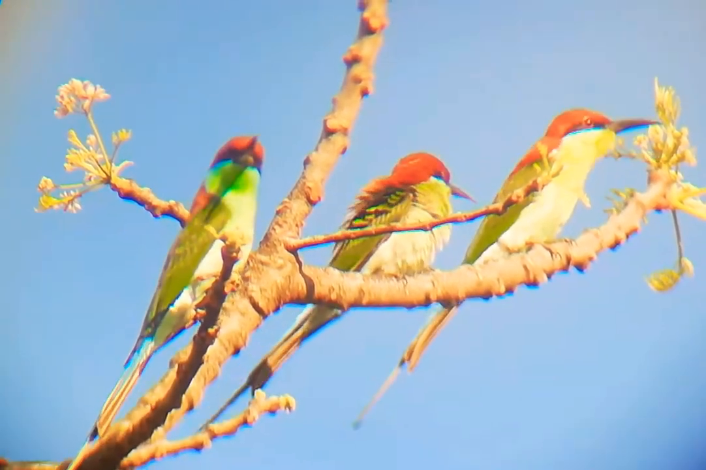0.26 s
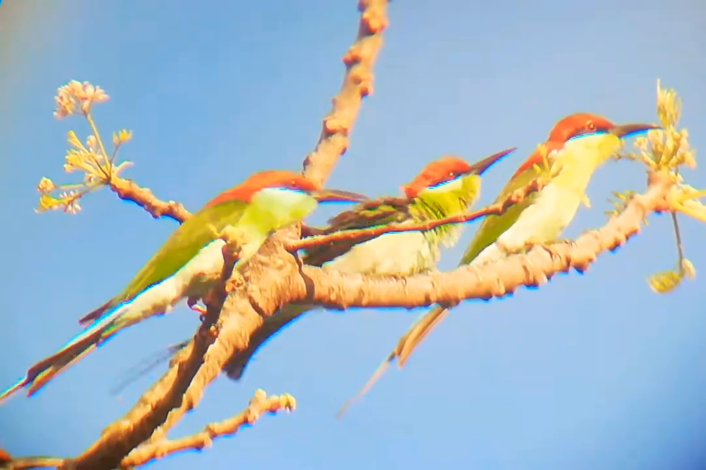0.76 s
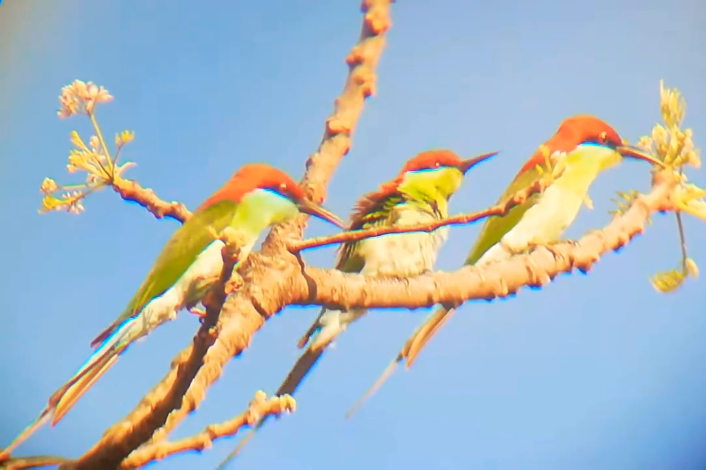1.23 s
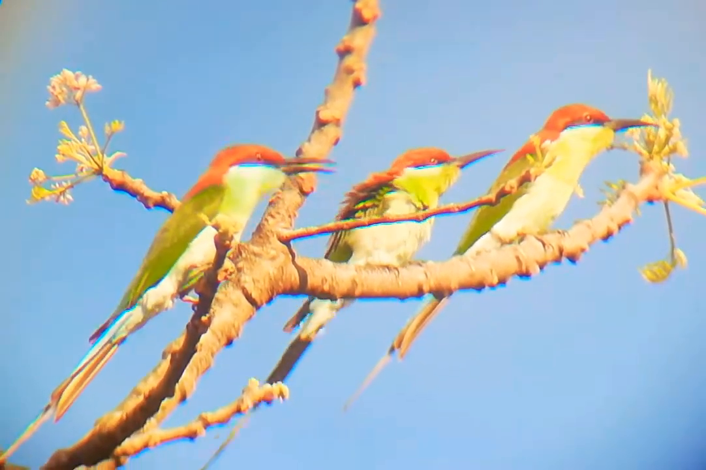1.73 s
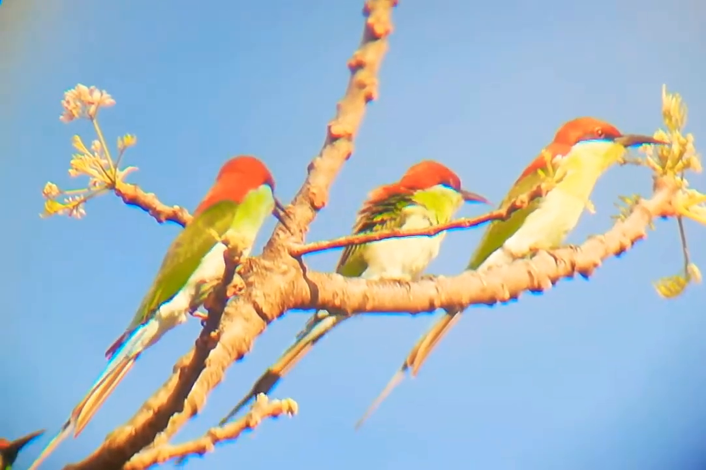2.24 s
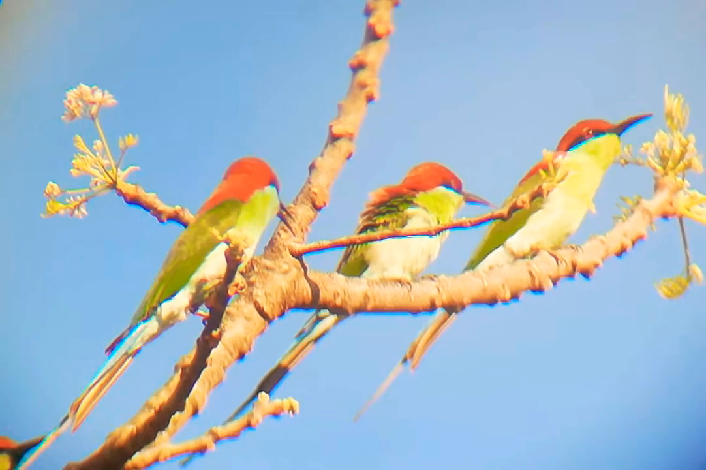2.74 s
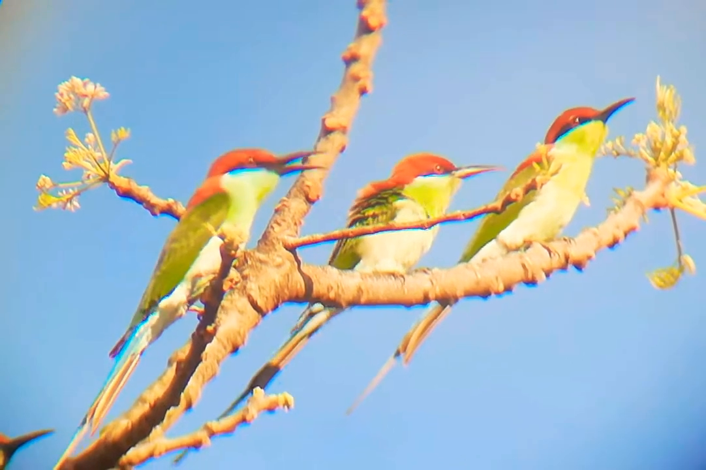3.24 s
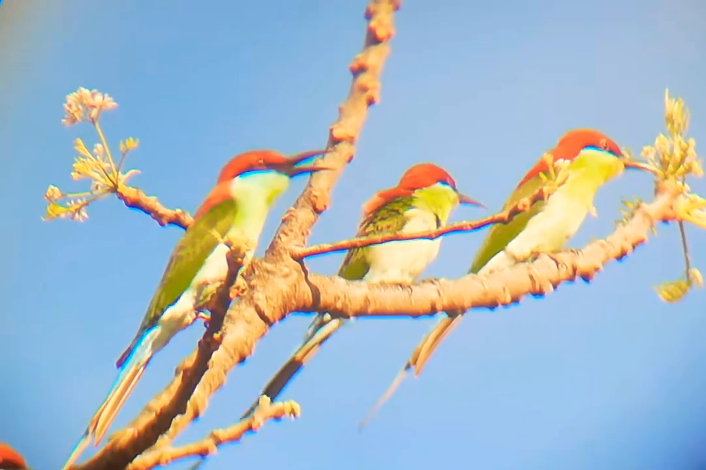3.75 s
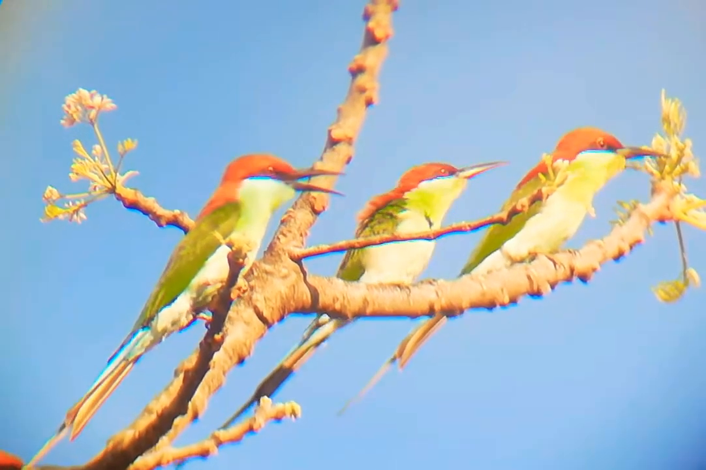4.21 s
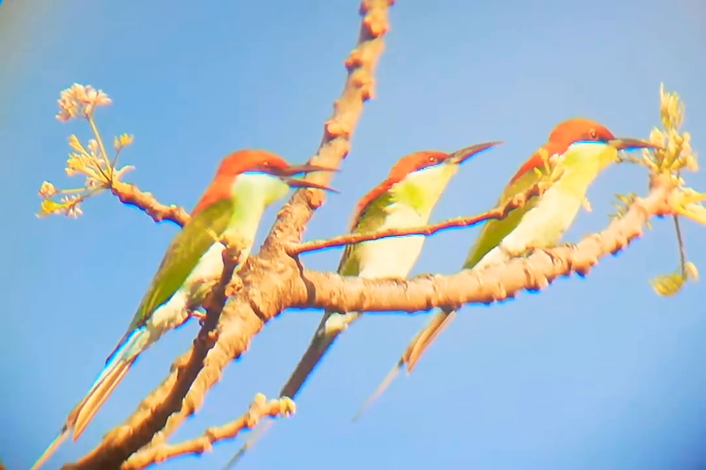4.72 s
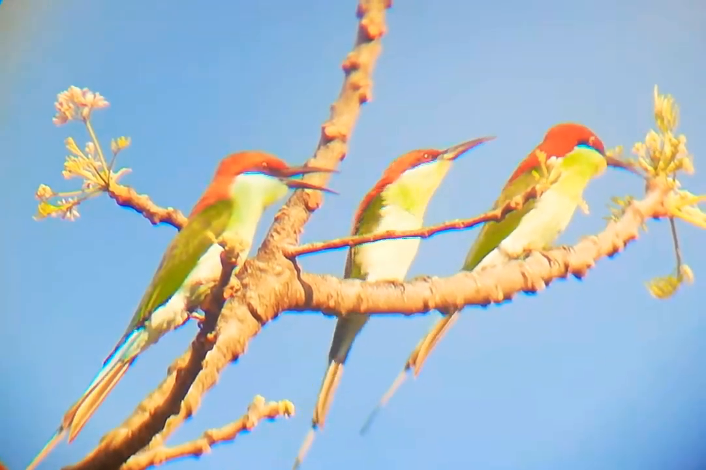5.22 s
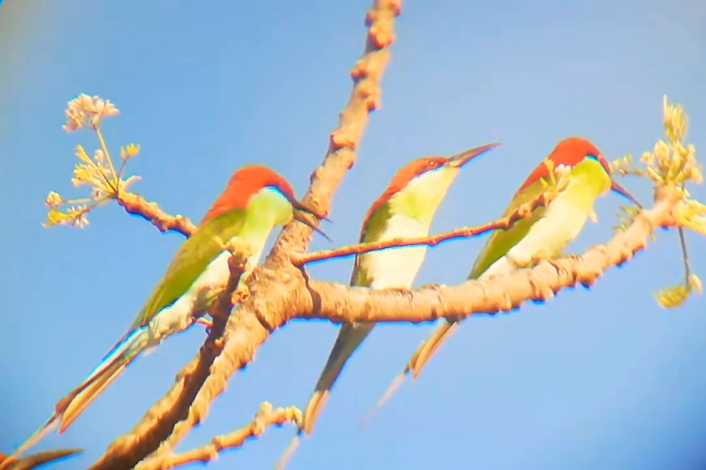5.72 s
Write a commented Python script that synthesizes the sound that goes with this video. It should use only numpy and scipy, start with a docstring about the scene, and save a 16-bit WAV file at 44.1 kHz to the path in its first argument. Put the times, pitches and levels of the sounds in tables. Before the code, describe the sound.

A small flock of bee-eaters calls close by in the open air. Short arching, rolling chirps, some clean, many cracking at the top, come in loose clusters, with one sharp upward note near the start. Faint hoots and a whistle sound far off. Calls thicken and strengthen in the last two seconds as wind buffets the microphone with deep rumble.

```python
"""Bee-eaters on three perches call over one another: each "prreep" is an arch of pitch made of a sine and
its overtones, whistled clean or cracking into a lower register near its top; one sharp "pwik" speeds upward.
Wind, as filtered noise, rumbles on the microphone, strongest near the end, over a steady hush, a drone and a rasp.
An insect trills high up as pulsed narrow-band noise under a wavering sine, and a few ticks ring thinly.
Two other birds, swept tones, whistle and hoot far away; decaying random echoes surround all the birds."""
import sys
import numpy as np
from scipy import signal
from scipy.fft import rfft, irfft, next_fast_len
from scipy.io import wavfile
from scipy.ndimage import uniform_filter1d

SR = 44100
rng = np.random.default_rng(int(sys.argv[2]) if len(sys.argv) > 2 else 0)


def file_out(sig):
    """Save sig as 16-bit WAV at sys.argv[1]."""
    # one column per channel
    cols = np.atleast_2d(sig).T
    # limit, then scale
    lim = np.clip(cols, -1, 1)
    pcm = np.round(lim * 32767).astype(np.int16)
    wavfile.write(sys.argv[1], SR, pcm)


N = 263277
T = np.arange(N) / SR  # seconds
# the sharp note: its start and the length of its upward sweep
PWIK_S, PWIK_SWEEP_S = .851, .018


def amp(db):
    """The decibel: 20 dB is a factor of ten in amplitude."""
    return 10 ** (np.asarray(db) / 20)


def evened(x):
    """Normalization to a root-mean-square value of 1."""
    return x / np.sqrt(np.mean(x ** 2) + 1e-20)


def read(points, hz):
    """Interpolation by straight lines on a logarithmic frequency axis."""
    f, value = np.transpose(points)
    return np.interp(np.log(hz + 1), np.log(f + 1), value)


def wander(rate_hz):
    """Low-pass random modulation: Gaussian-filtered noise of RMS 1 that varies up to about rate_hz."""
    hz = np.fft.rfftfreq(N, 1 / SR)
    spectrum = rfft(rng.standard_normal(N))
    return evened(irfft(spectrum * np.exp(-(hz / rate_hz) ** 2), N))


def noise(colour_db, likeness):
    """Coloured noise in two channels; their correlation is the share of power they have in common."""
    size = next_fast_len(N)
    a, b, shared = rng.standard_normal((3, size))
    same = np.clip(likeness, 0, 1)
    white = np.sqrt(same) * shared + np.sqrt(1 - same) * np.array([a, b])
    colour = amp(colour_db(np.fft.rfftfreq(size, 1 / SR)))
    return evened(irfft(rfft(white) * colour, size)[:, :N])


def band(centre_hz, width_hz):
    """Resonance: independent noise in each channel, shaped by one broad peak."""
    return noise(lambda hz: -20 * np.log10(1 + (2 * (hz - centre_hz) / width_hz) ** 2), 0)


def turning(hz):
    """Phase in radians, the running integral of frequency."""
    return 2 * np.pi * np.cumsum(hz) / SR


def fade(t, edge_s):
    """Gradual onset and release, linear in amplitude, which avoid clicks."""
    return np.clip(np.minimum(t - t[0], t[-1] - t) / edge_s, 0, 1)


def glide(rows, harmonics):
    """Frequency modulation: harmonics follow one curve of pitch and level given as s, Hz and dB."""
    s, hz, db = np.transpose(rows)
    t = np.arange(s[0], s[-1], 1 / SR)
    phase = turning(np.interp(t, s, hz))
    tone = sum(amp(part_db) * np.sin(round(k) * phase) for k, part_db in harmonics)
    level = amp(np.interp(t, s, db))
    return s[0], np.sqrt(2) * level * fade(t, .002) * tone


def add(mix, s, sound):
    """Superposition: adds a sound to the mix from time s on."""
    at = round(s * SR)
    sound = sound[..., max(-at, 0):]
    part = mix[..., max(at, 0):][..., :sound.shape[-1]]
    part += sound[..., :part.shape[-1]]


def ticks(ring_hz=5420, ring_t60=0.24, snap_t60=0.34):
    """Damped resonance: a quick upward flick, then a bright snap and a thin ring that decay exponentially."""
    # Each row: time in seconds, relative level in dB, snap over ring in dB.
    tick_rows = [(-.006, -56, -8), (0.082, -51.5, -12.5), (0.213, -55.5, -5)]
    out, snap, ring = np.zeros((2, N)), band(4600, 6800), band(ring_hz, 180)
    for s, db, snap_db in tick_rows:
        flick = [(s - .012, 4200, db - 20), (s - .002, 4800, db - 10), (s + .006, 5700, db - 6)]
        add(out, *glide(flick, [(1, 0)]))
        age = np.maximum(T - s, 0)
        attack = np.minimum(age / 0.0045, 1)
        decaying_ring = ring * amp(-60 * age / ring_t60)
        decaying_snap = snap * amp(snap_db - 60 * age / snap_t60)
        out += amp(db + 0.5) * attack * (decaying_ring + decaying_snap)
    return out


def wind():
    """Pressure fluctuation at the microphone: gusting low noise, with buffets that each push and pull once."""
    # Wind strength. Each row: time in seconds, level in dB.
    gust_rows = [(0.0, -43), (0.53, -45.5), (0.58, -42), (0.86, -49), (1.6, -36.5), (1.81, -51),
                 (4.19, -48), (4.62, -33), (5.2, -34.5), (5.4, -45.5), (5.64, -34.5), (5.97, -45)]
    # Colour of the rumble. Each row: frequency in Hz, relative spectral density in dB.
    rumble_colour = [(12, -6), (40, 3), (70, -3), (115, -9.5), (160, -19), (220, -34), (400, -50.5),
                     (900, -115)]
    # Single buffets. Each row: centre in seconds, peak level in dB, time from centre to either peak in seconds.
    buffet_rows = [(.06, -28, 0.0042), (0.596, -28, .0034), (5.065, -26.5, 0.0064), (5.236, -24, .0036)]
    gusts = amp(np.interp(T, *np.transpose(gust_rows)))
    rumble = gusts * noise(lambda hz: read(rumble_colour, hz), .94)
    for s, db, duration in buffet_rows:
        u = (T - s) / duration
        rumble = rumble - amp(db) * u * np.exp(.5 - .5 * u ** 2)
    return rumble


def insect(trill_db=-80, whine_db=-84):
    """Amplitude modulation: noise pulsed about 24 times a second, under a sine in tiny uneven arches, to the right."""
    beat = turning(24 * (1 + .02 * wander(3)))
    trill = evened((1 + .9 * np.cos(beat)) * band(8660, 320))
    arch = abs(np.sin(turning(9 * (1 + .5 * wander(30)))))
    whine_level = arch * amp(3 * wander(90))
    whine_hz = 8850 + 350 * arch + 130 * wander(300)
    whine = evened(whine_level * np.sin(turning(whine_hz)))
    return (amp(trill_db) * trill + amp(whine_db) * whine) * amp([[-3], [2]])


def background(air_db=-62):
    """Stationary broadband noise for the open air, with two narrower bands: a varying drone and a faint far rasp."""
    # Colour of the air. Each row: frequency in Hz, relative spectral density in dB.
    air_colour = [(130, 12.5), (200, 11.5), (290, 6.5), (480, -11.5), (800, -8.5), (1500, -5), (2600, 0.5),
                  (4200, -14), (5600, -13.5), (7200, -15.5), (8800, -10.5), (10500, -24), (15500, -22)]
    # Drone that comes and goes. Each row: time in seconds, level in dB.
    drone_levels = [(0, -81), (.28, -77), (.45, -79), (1.9, -84), (2.2, -70), (2.6, -90), (5.1, -90.5),
                    (5.6, -63), (5.97, -68)]
    # Rasp far off. Each row: time in seconds, level in dB.
    rasp_levels = [(5.1, -100), (5.17, -67), (5.48, -63.5), (5.56, -100)]
    drone = amp(np.interp(T, *np.transpose(drone_levels))) * band(276, 130)
    hush = amp(air_db) * noise(lambda hz: read(air_colour, hz), 0.15)
    rasp = amp(np.interp(T, *np.transpose(rasp_levels))) * band(1510, 190)
    return hush + drone + rasp


def arch_hz(t, rise, fall, top_hz, lead, shoulder_hz, end_hz, bend):
    """Pitch contour around the top (t = 0): a low hump, a climb, a quick drop to a shoulder and a slide."""
    foot_hz, hump_hz = 2420, 132.3
    shoulder_share = 0.3  # of the fall's length
    hump = hump_hz * np.sin(np.pi * np.clip((-t - rise) / max(lead, 1 / SR), 0, 1) ** 2)
    climb = foot_hz + (top_hz - foot_hz) * np.clip(1 + t / rise, 0, 1) ** bend
    slur = np.interp(t / fall, [0, shoulder_share, 1], [top_hz, shoulder_hz, end_hz])
    return uniform_filter1d(np.where(t < 0, climb + hump, slur), size=150)


def effort_db(t, rise, fall, lead, lead_db, crest_db, swell_db):
    """Level envelope around the top (t = 0): soft lead-in, push, choked crest, loud slur, release."""
    push_share, choke_share = 0.32, 0.59  # of the rise
    open_share, slur_share = 0.29, 0.31  # of the fall
    lead_gain_db, push_db, release_db = 1, -2.5, -13
    stage = np.where(t < 0, t / rise, t / fall)
    shape = np.interp(stage, [-1 - lead / rise, -1, push_share - 1, choke_share - 1, open_share, slur_share, 1],
                      [lead_db, lead_db + lead_gain_db, push_db, crest_db, crest_db, 0, release_db])
    return shape + swell_db * np.clip(stage, -.5, .5)


def prreep(row, chance, tremor, low_hz=2230, low_db=0.5, jitter=.011, shimmer_db=1.0,
           octave_db=-25, dip_db=-5, overshoot=.025):
    """Voice registers: a harmonic tone rises, roughens at its crest, may crack downward, and falls in a slur."""
    # Each voice: shoulder in Hz, end in Hz, crest in dB against the call's level, roughness,
    # bend of the climb (under 1 is rounded), lead-in in dB against the call's level.
    voice_table = {"cracked": (2929, 2233.5, -6.5, 1.34, 0.72, -13),
                   "clean": (3077.5, 2383, -4, 1, 1.08, -21.5),
                   "hoarse": (2875.5, 2561, -7.5, 1.2, .85, -11.5)}
    # Each voice: nominal starts of its cracks in seconds before the top.
    crack_times = {"cracked": (.023, .006), "clean": (), "hoarse": (.01,)}
    # Each perch: milliseconds by which the left ear hears it later.
    late_ms = {"left": -0.044, "middle": 0.2, "right": .26}
    crack_length_s, crack_scatter_s = 0.006, .0015
    # a harder call is richer: dB of overtones gained for each dB above an ordinary call
    ordinary_db, richer_per_db = -32.5, 0.17

    top, rise, fall, top_hz, db, swell_db, lead, voice, perch = row
    shoulder_hz, end_hz, crest_db, roughness, bend, lead_db = voice_table[voice]
    t = np.arange(-rise - lead, fall, 1 / SR)
    low, strain = np.zeros(len(t)), np.zeros(len(t))
    for before, luck in zip(crack_times[voice], chance):
        age = t + before + crack_scatter_s * luck
        low = np.maximum(low, (age > 0) & (age < crack_length_s))
        # at both edges of a crack the pitch overshoots and the voice chokes
        edge_distance = np.minimum(abs(age), abs(age - crack_length_s))
        strain += np.exp(-(edge_distance / .0015) ** 2)
    low = uniform_filter1d(low, size=40)

    waver, flutter, flicker = (np.interp(top + t, T, shake) for shake in tremor)
    rough = .7 + 1.6 * roughness * np.exp(-(t / .025) ** 2)
    hz = arch_hz(t, rise, fall, top_hz, lead, shoulder_hz, end_hz, bend)
    hz = (hz + (low_hz - hz) * low) * (1 + overshoot * strain + jitter * rough * waver)
    level = amp(db + effort_db(t, rise, fall, lead, lead_db, crest_db, swell_db))
    level = level * amp(low_db * low + dip_db * strain + shimmer_db * rough * flutter)
    phase = turning(hz) + np.array([[-1], [1]]) * np.pi * hz * late_ms[perch] / 1000

    # the overtones flicker, and pass the open bill best at the top of the arch
    bill_db = np.minimum(hz - 3200, 0) / 110 + 4.5 * flicker
    richness = amp(octave_db + bill_db + richer_per_db * (db - ordinary_db))
    overtone_level = np.sqrt(level * amp(db + crest_db)) * richness * (1 - low)
    overtones = np.sin(2 * phase) + amp(-10.5) * np.sin(3 * phase) + amp(-17) * np.sin(4 * phase)
    return top + t[0], np.sqrt(2) * fade(t, 0.00097) * (level * np.sin(phase) + overtone_level * overtones)


def flock(hiss_db=-32, murmur_db=-23):
    """Superposition of all calls, each "prreep" with one reflection, and noise that follows their loudness."""
    # Each row: top in seconds, rise in seconds, fall in seconds, nominal top in Hz, relative level in dB,
    # gain of the fall over the rise in dB, lead-in in seconds, voice, perch.
    call_rows = [(.016, .02, 0.052, 3315, -45.5, 0, 0, "cracked", "middle"),
                 (.198, .038, 0.052, 3250, -40, 3.5, 0, "clean", "left"),
                 (.303, 0.023, 0.028, 3310, -40.5, 1, 0.015, "cracked", "right"),
                 (0.503, 0.049, 0.03, 3380, -39.5, 0.5, 0.039, "clean", "left"),
                 (0.557, 0.027, 0.043, 3450, -34.5, -2, 0, "cracked", "middle"),
                 (.6, 0.026, 0.037, 3525, -40, 1, 0.0043, "cracked", "middle"),
                 (1.015, 0.041, 0.045, 3386, -39, 0, 0.057, "cracked", "middle"),
                 (1.111, 0.039, 0.025, 3220, -39, 6, 0.0058, "hoarse", "left"),
                 (1.166, 0.064, 0.039, 3414, -42, 3.5, 0.0015, "clean", "left"),
                 (1.263, .03, 0.054, 3480, -39, 1, 0.036, "cracked", "middle"),
                 (1.325, 0.032, 0.052, 3324, -36.5, 0, 0, "cracked", "middle"),
                 (1.53, 0.046, .036, 3420, -40, 1, 0.034, "clean", "left"),
                 (1.566, .03, 0.034, 3100, -40.5, 6, 0.0066, "hoarse", "left"),
                 (1.639, 0.032, .046, 3160, -38, 2, 0.005, "hoarse", "middle"),
                 (2.026, 0.046, .043, 3180, -43.5, 7.5, 0.011, "cracked", "left"),
                 (2.147, 0.041, 0.016, 3430, -56.5, -6, 0, "clean", "right"),
                 (2.193, 0.04, 0.032, 3436, -39, 4.5, 0.044, "cracked", "left"),
                 (2.249, 0.055, 0.03, 3420, -42.5, 8, 0, "clean", "left"),
                 (2.307, 0.043, 0.044, 3020, -36.5, 3, 0.0041, "hoarse", "left"),
                 (2.551, 0.042, .042, 3233, -38.5, 0.5, 0.045, "cracked", "middle"),
                 (2.784, 0.026, 0.037, 3513, -40, 1, 0.034, "cracked", "left"),
                 (2.862, .021, 0.012, 3150, -56.5, 7, 0, "clean", "left"),
                 (3.118, 0.043, .062, 3730, -35, 4.5, 0.032, "cracked", "middle"),
                 (3.271, 0.048, 0.047, 3390, -45, 4, 0, "clean", "middle"),
                 (3.483, 0.045, 0.06, 3430, -32.5, 3, 0.027, "cracked", "middle"),
                 (3.536, 0.048, 0.06, 3300, -36.5, 0.5, 0.0019, "cracked", "left"),
                 (3.867, 0.045, 0.073, 3357, -35, 2.5, 0.032, "cracked", "middle"),
                 (3.971, 0.052, 0.029, 3540, -37.5, 0, 0, "cracked", "middle"),
                 (4.163, 0.04, 0.052, 3316, -40, 0, 0.034, "cracked", "right"),
                 (4.347, 0.045, 0.069, 3260, -36, -1, 0.034, "cracked", "middle"),
                 (4.388, 0.048, 0.046, 3520, -38, 0.5, 0.0037, "cracked", "right"),
                 (4.437, .035, 0.0264, 3480, -37, -6, 0.0074, "hoarse", "middle"),
                 (4.494, 0.041, 0.012, 3680, -50, 2, 0.012, "clean", "middle"),
                 (4.545, 0.039, 0.061, 3240, -33.5, -3.5, .04, "cracked", "right"),
                 (4.639, 0.036, 0.032, 3192, -37.5, -10.5, 0.0078, "clean", "left"),
                 (4.696, 0.043, 0.058, 3250, -36.5, 0, 0.0074, "hoarse", "left"),
                 (4.745, .02, 0.025, 3315, -37.5, 1, 0.0022, "cracked", "middle"),
                 (4.981, 0.033, 0.061, 3154, -33.5, -3, 0.05, "cracked", "right"),
                 (5.066, .035, .012, 3580, -46, -18, 0, "clean", "middle"),
                 (5.13, 0.042, 0.011, 3210, -37, 4, 0, "clean", "middle"),
                 (5.173, .035, .05, 3300, -32.5, 3, .03, "cracked", "right"),
                 (5.212, 0.034, .05, 3385, -34.5, 4, 0, "cracked", "left"),
                 (5.302, 0.054, 0.058, 3150, -34.5, 1.5, 0, "cracked", "right"),
                 (5.433, 0.053, 0.067, 3290, -32.5, 0, 0.02, "cracked", "middle"),
                 (5.629, 0.039, 0.034, 3230, -32.5, -2.5, 0.041, "cracked", "right"),
                 (5.697, 0.053, 0.065, 3185, -30.5, -1.5, 0.0043, "hoarse", "middle"),
                 (5.956, 0.034, 0.029, 3130, -33, -5.5, 0.045, "cracked", "right")]
    out, tremor = np.zeros((2, N)), (wander(256), wander(180), wander(74))
    bounces_s = rng.uniform(.009, .03, len(call_rows))
    for row, bounce_s, chance in zip(call_rows, bounces_s, rng.standard_normal((len(call_rows), 2))):
        s, call = prreep(row, chance, tremor)
        add(out, s, call)
        add(out, s + bounce_s, amp(-14) * call[::-1])  # the reflection swaps the ears
    for note in pwik():
        add(out, *note)
    loudness = np.sqrt(abs(uniform_filter1d(out[0] ** 2, size=400)))
    # frequency in Hz, relative spectral density in dB
    hiss_colour = [(500, 4.5), (1800, -18.5), (4300, 1.5), (6000, 7.5), (10000, -5.0), (15000, -7.5)]
    hiss = noise(lambda hz: read(hiss_colour, hz), 0)
    call_noise = amp(hiss_db) * hiss + amp(murmur_db) * band(2433, 1210)
    return (out + loudness * call_noise) * amp([[.5], [-.5]])


def pwik(octave_db=-24, drop_fade_db=-15):
    """Accelerating frequency sweep that swells as it climbs, then breaks into a low falling note that dies away."""
    level_db, drop_s = -42.5, .017
    start_hz, top_hz, break_hz, end_hz = 2650, 3800, 2400, 1950
    u = np.linspace(0, 1, num=30)
    sweep_hz = start_hz + (top_hz - start_hz) * (u + 2 * u ** 3) / 3
    sweep = np.c_[PWIK_S + PWIK_SWEEP_S * u, sweep_hz, level_db - 20 * (u - .7) ** 2]
    drop_hz = break_hz + (end_hz - break_hz) * u
    drop = np.c_[PWIK_S + PWIK_SWEEP_S + drop_s * u, drop_hz, level_db + drop_fade_db * u ** 2]
    return glide(sweep, [(1, 0), (2, octave_db)]), glide(drop, [(1, 0)])


def pwik_scatter(db=-56.5, t60=0.45):
    """Diffuse reflection: the top of the sharp note returns from the trees as decaying narrow-band noise."""
    age = np.maximum(T - PWIK_S - PWIK_SWEEP_S, 0)
    return amp(db - 60 * age / t60) * np.minimum(age / .01, 1) * band(3830, 750)


def far_birds(hoot_hz=1145):
    """Frequency-modulated tones: a long harmonic whistle, and pure hoots that slide up and sag slightly at the end."""
    # Whistle. Each row: time in seconds, pitch in Hz, relative level in dB.
    whistle_curve = [(2.36, 1430, -72), (2.45, 1760, -77), (2.52, 1920, -71), (2.6, 2110, -72),
                     (2.67, 2180, -70), (2.72, 2090, -69.5), (2.79, 1830, -73), (2.83, 1720, -88)]
    # Its harmonics. Each row: multiple of the pitch, relative level in dB.
    whistle_parts = [(2, -6), (3, -3.5), (4, -10.5), (5, -16)]
    # Hoots. Each row: start in seconds, length in seconds, relative level in dB.
    hoot_rows = [(1.804, 0.057, -83), (2.017, .08, -88), (2.17, 0.091, -76.5), (2.625, 0.051, -81.5),
                 (2.766, 0.054, -76), (2.894, 0.081, -83), (3.086, 0.11, -71.5), (3.319, .11, -76),
                 (3.857, 0.045, -74), (3.969, .04, -79), (4.107, 0.042, -79.5), (4.277, .1, -80.5)]
    out = np.zeros((2, N))
    add(out, *glide(whistle_curve, whistle_parts))
    out = out * amp(4.5 * wander(25) - 4)  # the far whistle fades in and out
    for s, length, db in hoot_rows:
        shape = [(s, .87 * hoot_hz, db - 3),
                 (s + .22 * length, .97 * hoot_hz, db + 1),
                 (s + .6 * length, hoot_hz, db + 2),
                 (s + length, .96 * hoot_hz, db - 3)]
        add(out, *glide(shape, [(1, 0)]))
    return out * amp(2 * wander(60))


def surroundings(x, near_db, tail_db, near_t60=0.039):
    """Reverberation by convolution: quick echoes off near branches and ground, a soft tail from farther trees."""
    # Decay of the tail. Each row: frequency in Hz, time to fall by 60 dB in seconds.
    tree_decay = [(1000, 0.27), (3000, 0.28), (9000, 0.51)]
    t = T[:SR // 2]
    dense = rng.choice([-1., 1.], (2, len(t))) * (rng.random((2, len(t))) < 2000 / SR)
    hz, s, z = signal.stft(dense, SR, nperseg=256)
    decaying = z * amp(-60 * s / read(tree_decay, hz)[:, None])
    tail = signal.istft(decaying, SR, nperseg=256)[1][:, :len(t)] * np.minimum(t / 0.057, 1)
    sparse = rng.standard_normal((2, len(t))) * (rng.random((2, len(t))) < 600 / SR)
    near = sparse * amp(-60 * t / near_t60) * (t > .002)
    echo = sum(amp(db) * part / np.linalg.norm(part, axis=1, keepdims=True)
               for db, part in [(near_db, near), (tail_db, tail)])
    return x + signal.fftconvolve(x, echo, axes=1)[:, :N]


def scene():
    """Superposition of near birds, far birds, ticks, insect, wind and background."""
    close = surroundings(flock(), near_db=-5, tail_db=-13.5) + pwik_scatter()
    far = surroundings(far_birds(), near_db=-8, tail_db=-6)
    return close + far + ticks() + insect() + wind() + background()


def record(dry, edge_hz=15700):
    """Band limitation: a linear-phase low-pass filter removes the highest treble."""
    low_pass = signal.firwin(511, edge_hz, window=("kaiser", 9), fs=SR)
    return signal.oaconvolve(dry, low_pass[None], "same")


dry = scene()
out = record(dry)
file_out(out)
```